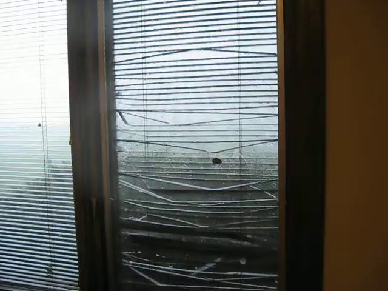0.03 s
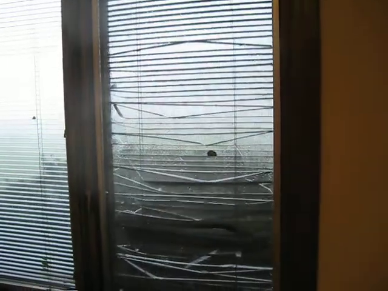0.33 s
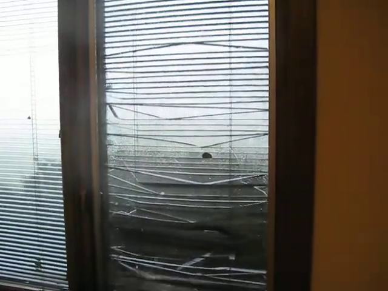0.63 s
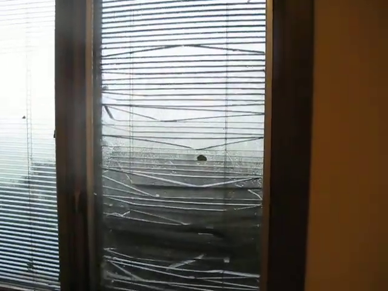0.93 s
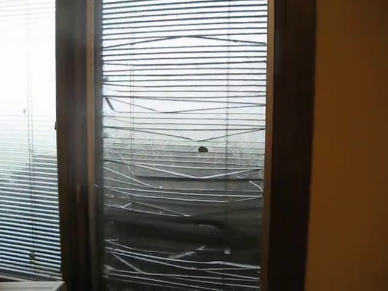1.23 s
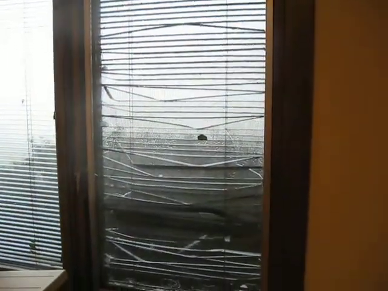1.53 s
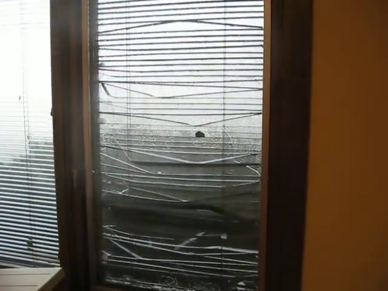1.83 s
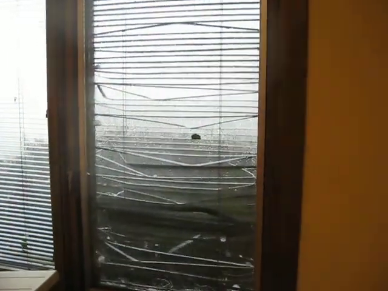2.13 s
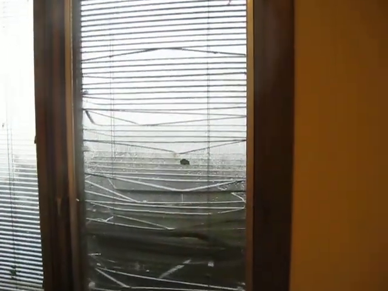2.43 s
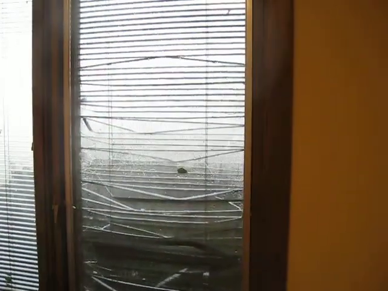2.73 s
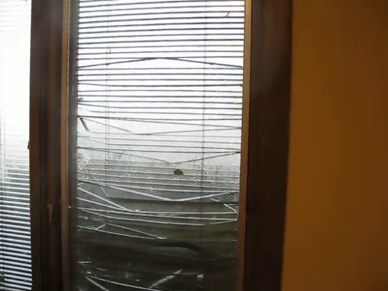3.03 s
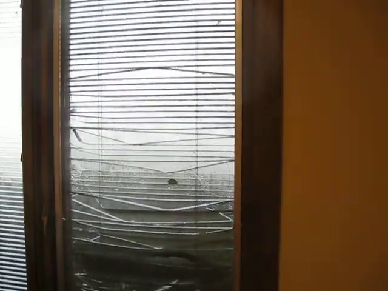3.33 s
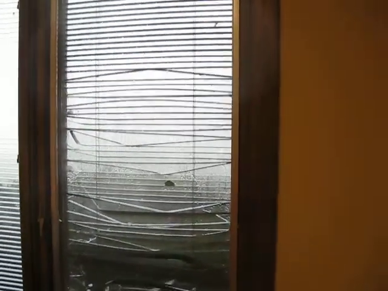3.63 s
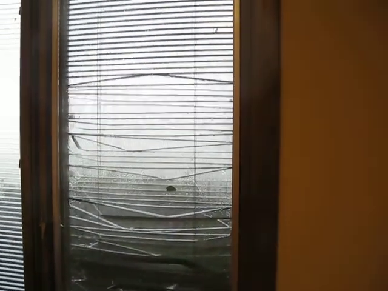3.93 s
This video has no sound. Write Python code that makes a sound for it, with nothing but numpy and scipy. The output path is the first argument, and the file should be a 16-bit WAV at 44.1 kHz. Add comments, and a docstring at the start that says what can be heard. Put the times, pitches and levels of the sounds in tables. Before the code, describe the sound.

Hailstones crack against windows over a roar of wind-driven rain, heard from indoors.

```python
"""A hailstorm beats on office windows, heard from inside the room.
After an instant of silence, wind-driven rain roars and drums on the panes, small ice patters and big
stones crack against the glass. Hard blows overload the recorder, whose gain control ducks the storm
and lets it swell back. From about 1.1 s, stones also hit farther windows and spray hisses on the glass.
From about 2.8 s to the end, the big stones fall thicker and the pane booms more strongly."""
import sys
import numpy as np
from scipy import signal
from scipy.io import wavfile
from scipy.ndimage import minimum_filter1d

SR = 44100
rng = np.random.default_rng(int(sys.argv[2]) if len(sys.argv) > 2 else 0)


def master_out(mix):
    """Clip the mix to full scale and print it as 16-bit PCM to the path in sys.argv[1]."""
    frames = np.transpose(np.atleast_2d(mix))
    ceiling = np.clip(frames, -1, 1)
    pcm = np.round(ceiling * 32767).astype(np.int16)
    wavfile.write(sys.argv[1], SR, pcm)


N = 176400

# force of the storm, as the level of its roar: t/s, level/dB
GUSTS = [(0, -27), (.3, -21), (.42, -19.5), (.6, -22), (.85, -20), (1.0, -24.5), (1.15, -21.5),
         (1.4, -22.5), (1.5, -24), (1.7, -19.5), (1.85, -20.5), (2.1, -23.5), (2.33, -21), (2.5, -21.5),
         (2.95, -24.5), (3.1, -21), (3.5, -24), (3.8, -21.5)]
# relative spectral densities of rain, spray, small ice, a stone's crack and its room tail: f/Hz, level/dB
ROAR_SPECTRUM = [(25, -28), (55, -56), (90, -4.5), (150, 1.5), (230, 5), (330, -1), (520, 3.5), (800, -1.5),
                 (1400, -6), (3000, -12.5), (6000, -18.5), (10000, -25.5), (16000, -32)]
SPRAY_SPECTRUM = [(2000, -9), (6000, 7), (9500, -0.5), (12000, 2), (16000, 10)]
PATTER_SPECTRUM = [(200, -16), (800, -1.5), (1500, -4.5), (2900, 0.5), (4300, -4.5), (6300, -11),
                   (10000, -19), (16000, -35)]
CRACK_SPECTRUM = [(100, -20), (450, -15.5), (1000, -8), (1600, -3.5), (2700, 0), (4500, -0.5), (6500, -1.5),
                  (10500, -4), (16000, -10)]
ROOM_SPECTRUM = [(100, -42), (450, -13), (900, -4.5), (1600, -2), (2900, -0.5), (4500, -2), (6300, -1.5),
                 (10500, -6.5), (16000, -16)]
# pane modes driven by the rain: f/Hz, relative level/dB, T60/s
DRUM_MODES = [(119.6, -2, 0.23), (168, -16, 0.13), (228.6, -1, 0.39), (258.7, 1.5, 0.33), (484, 4, 0.21),
              (580, 5.5, 0.071), (742, 5.5, 0.089)]
# sheets of spray on the glass: t/s, duration/s, level/dB
SPRAYS = [(1.163, .045, -26), (1.696, 0.064, -41), (1.836, 0.084, -31), (2.38, 0.015, -26),
          (2.61, 0.16, -39), (3.09, 0.022, -30), (3.34, .055, -30), (3.742, .012, -41), (3.78, 0.032, -33)]
# stones on farther windows, heard only through the room: t/s, level/dB
FAR_STONES = [(1.1254, -18.5), (1.335, -17.5), (1.6125, -20.5), (2.1481, -23), (2.2634, -25.5),
              (2.372, -18.5), (2.4575, -20), (2.669, -19.5), (3.0935, -25), (3.244, -20.5), (3.6637, -25),
              (3.709, -18.5)]
# modes of the whole pane under a stone: f/Hz, relative level/dB, T60/s
BOOM_MODES = [(276, -14.5, 0.72), (459.5, -14.5, 0.073), (766, -4.5, 0.22), (856, -8, 0.14),
              (940, -8.5, 0.17)]
# clusters of close high modes: f/Hz, bandwidth/Hz, relative level/dB, T60/s
RATTLE_CLUSTERS = [(5620, 390, -19, .27), (6320, 520, -12.5, 0.096)]
# damped modes of a knock: ratio to the knock's f, relative level/dB, T60/s
KNOCK_MODES = [(.36, -20.5, 0.059), (0.682, -15.5, 0.075), (.9, -18, 0.049), (1, -2, 0.03),
               (1.129, -7, 0.018), (1.55, -18, 0.036)]
# big stones on the near pane: t/s, level/dB, treble/dB, knock/dB, knock f/Hz, boom/dB
# (treble, knock and boom are relative to the stone's level)
NEAR_STONES = [(.04, 0.5, -4.5, -26, 2820, -22), (.083, 0.5, -11.5, -2, 1910, -19),
               (0.1675, 2, -2.5, -7, 3290, -33), (.4465, -28.5, 9, -10, 2800, -23),
               (0.4948, -8, -2.5, 7, 2730, -32), (0.5336, -11, -6, -6, 2900, -18),
               (0.6599, 6, 3.5, -9.5, 2800, -32), (0.8407, -1, -4.5, 1, 2790, -30),
               (0.8604, 3, 6, 1, 2500, -35), (1.0279, -17, 3, 12.5, 2710, -20),
               (1.2088, -1.5, -9.5, -1, 2560, -27), (1.4288, -5, -10, -14, 2600, -25),
               (1.4698, -9, -6, -2, 2650, -9), (1.964, 1.5, -15, -0.5, 2750, -16),
               (1.9749, 2.5, 0, -19, 3050, -28), (2.0188, -1, -5, 3.5, 2570, -5),
               (2.2039, -9.5, -10, 0.5, 2590, -14), (2.5128, 5, 2, -1.5, 2274, -36),
               (2.7606, -12, 1.5, -1, 2770, 0), (2.8285, -29, 9, -9, 2300, -10),
               (2.848, -8, -8, 0, 2150, -13), (2.869, -7, -5.5, -5, 2950, -11),
               (2.9472, -6, -6, 1, 2740, -8), (3.1446, -6, -6.5, 0, 2370, -20),
               (3.2954, -7, -12.5, -16, 2700, -14), (3.383, -4.5, 5, -4, 2740, -10),
               (3.4408, -4.5, -17, -4, 2780, -7), (3.4795, -7.5, -7, -7, 2520, -23),
               (3.5688, -22, 0, -9, 2700, -10), (3.578, -8.5, -2, 3.5, 2940, -9),
               (3.8278, -6.5, -16.5, -4.5, 2520, -9.5), (3.8845, -4.5, -4, 8, 2740, -5),
               (3.909, -7, -7, -4, 2800, -15), (3.923, -7, -5, 2, 2680, -12),
               (3.9635, -5, -11, 4.5, 2000, -18)]

BAND_EDGES_HZ = 22 * 2 ** np.arange(0, 9.9, 1 / 3)
BAND_CENTRES_HZ = np.sqrt(BAND_EDGES_HZ[1:] * BAND_EDGES_HZ[:-1])
ROOM_T60_S = 0.31
COLOUR_DB = 2.07   # spread of an impact's level from band to band
TIME = np.arange(N) / SR


def from_db(db):
    """Amplitude grows tenfold for every 20 dB."""
    return 10 ** (np.asarray(db) / 20)


def unit_rms(x):
    """Division by the rms gives a signal of unit power."""
    return x / np.sqrt(np.mean(x ** 2) + 1e-20)


def band_gains(spectrum):
    """Band power is spectral density times bandwidth; the powers are scaled to sum to 1."""
    hz, db = np.transpose(spectrum)
    gain = from_db(np.interp(np.log(BAND_CENTRES_HZ), np.log(hz), db)) * np.sqrt(BAND_CENTRES_HZ)
    return gain / np.linalg.norm(gain)


def bandpass(x, edges_hz):
    """A band-pass filter attenuates frequencies outside its edges."""
    return signal.sosfilt(signal.butter(2, edges_hz, "band", fs=SR, output="sos"), x)


def noise_bands():
    """Filtering white noise gives third-octave bands of unit rms, incoherent with their neighbours."""
    white = rng.standard_normal((3, N + SR // 4))
    return np.array([unit_rms(bandpass(white[k % 3], BAND_EDGES_HZ[k:k + 2])[-N:])
                     for k in range(len(BAND_CENTRES_HZ))])


def drift(corner_hz, step=40, settle=2000):
    """Low-passed noise fluctuates slowly, with unit rms."""
    pole = np.exp(-2 * np.pi * corner_hz * step / SR)
    white = rng.standard_normal(N // step + settle + 2)
    slow = signal.lfilter([1], [1, -2 * pole, pole ** 2], white)[settle:]
    return np.interp(np.arange(N) / step, np.arange(len(slow)), unit_rms(slow))


def arrivals(per_s):
    """Poisson process: every sample has the same small chance of an impact."""
    return rng.random(N) < per_s / SR


def impulses(times, sizes):
    """Brief impacts are idealised as single-sample impulses."""
    return np.bincount(np.clip(times * SR, 0, N - 1).astype(int), sizes, N) + 1e-18


def decay(power, t60):
    """Exponential decay: each input of power falls by 60 dB in t60 seconds."""
    return signal.lfilter([1], [1, -10 ** (-6 / (t60 * SR))], power)


def resonator(force, hz, t60):
    """A damped oscillator answers a unit impulse with a decaying sine of height about 1."""
    pole, angle = from_db(-60 / (t60 * SR)), 2 * np.pi * hz / SR
    return signal.lfilter([0, np.sin(angle)], [1, -2 * pole * np.cos(angle), pole ** 2], force)


def rain(bands, storm_db, flicker_db=1.77, flicker_hz=11.8, drum_db=-10):
    """Incoherent addition merges drops and wind into a flickering roar; drops excite the panes' modes."""
    roar = sum(gain * band * from_db(flicker_db * drift(flicker_hz))
               for gain, band in zip(band_gains(ROAR_SPECTRUM), bands))
    drops = arrivals(per_s=900) * rng.standard_normal(N) + 1e-18
    drum = sum(from_db(db) * unit_rms(resonator(drops, hz, t60)) for hz, db, t60 in DRUM_MODES)
    return from_db(storm_db) * (unit_rms(roar) + from_db(drum_db) * unit_rms(drum))


def spray(bands):
    """Shot noise: fine droplets thrown against the glass overlap in bright hisses that swell and fade."""
    swells = sum(from_db(db) / (1 + ((TIME - start - length / 2) / (0.42 * length)) ** 6)
                 for start, length, db in SPRAYS)
    droplet_power = decay(arrivals(per_s=700) * rng.exponential(1, N) + 1e-18, t60=0.011)
    return swells * unit_rms(np.sqrt(droplet_power)) * (band_gains(SPRAY_SPECTRUM) @ bands)


def patter(bands, storm_db, mean_db=-27, gust_share=0.15, room_db=-6.5):
    """Incoherent powers add: random ticks of small ice, their reverberation and that of far stones."""
    times = np.flatnonzero(arrivals(per_s=220)) / SR
    far_times, far_db = np.transpose(FAR_STONES)
    far_power = decay(impulses(far_times, from_db(far_db) ** 2), t60=0.3)
    level = from_db(mean_db + gust_share * (storm_db - storm_db.mean()))
    out = 0
    for gain, band in zip(band_gains(PATTER_SPECTRUM), bands):
        ticks = impulses(times, from_db(COLOUR_DB * rng.standard_normal(len(times))) ** 2)
        power = decay(ticks, t60=0.023) + from_db(room_db) ** 2 * decay(ticks, ROOM_T60_S)
        out += gain * band * np.sqrt(power / power.mean() * level ** 2 + far_power)
    return out


def boom(times, levels_db, spread_db=2):
    """Impulse response of the whole pane: each blow excites each low mode with its own strength."""
    out = 0
    for hz, mode_db, t60 in BOOM_MODES:
        strengths = from_db(levels_db + mode_db + spread_db * rng.standard_normal(len(times)))
        out += resonator(impulses(times, strengths), hz, t60)
    return out


def rattle(times, levels_db, growth=1.1):
    """Modal overlap: close high modes blur into narrow-band noise, growing faster than the blow."""
    blows = impulses(times, from_db(growth * levels_db) ** 2)
    out = 0
    for hz, width_hz, db, t60 in RATTLE_CLUSTERS:
        cluster = bandpass(rng.standard_normal(N), [hz - width_hz / 2, hz + width_hz / 2])
        out += from_db(db) * unit_rms(cluster) * np.sqrt(decay(blows, t60))
    return out


def knocks(times, levels_db, pitches_hz, scatter=0.044):
    """Superposed damped modes ring briefly; where a stone lands sets the pitch and shifts the modes."""
    out, t = np.zeros(N + SR), np.arange(SR // 10) / SR
    ratio, mode_db, t60 = np.transpose(KNOCK_MODES)[:, :, None]
    for start, db, hz in zip(times, levels_db, pitches_hz):
        shift, phase = rng.standard_normal((2, len(ratio), 1))
        mode_hz = hz * ratio * (1 + scatter * shift * (ratio != 1))
        modes = np.sin(2 * np.pi * (mode_hz * t + phase))
        envelopes = from_db(db + mode_db - 60 * t / t60)
        out[int(start * SR):][:len(t)] += np.sum(envelopes * modes, axis=0)
    return out[:N]


def cracks(times, levels_db, treble_db, crush_s=0.0017, t60=0.046, shelf_hz=5300, room_db=-11.5):
    """Crushing ice radiates a broadband burst; its direct and reverberant sound add in power."""
    since_crush = np.maximum(np.arange(SR // 16) / SR - crush_s, 0)
    burst_power = 10 ** (-6 * since_crush / t60)
    crack_gains, room_gains = band_gains(CRACK_SPECTRUM), from_db(room_db) * band_gains(ROOM_SPECTRUM)
    out = 0
    for hz, crack_gain, room_gain, band in zip(BAND_CENTRES_HZ, crack_gains, room_gains, noise_bands()):
        colour_db = COLOUR_DB * rng.standard_normal(len(times))
        shelf_db = treble_db / (1 + (shelf_hz / hz) ** 4)
        blows = impulses(times, from_db(levels_db + colour_db + shelf_db) ** 2)
        direct = crack_gain ** 2 * np.abs(signal.oaconvolve(blows, burst_power)[:N])
        reverberant = room_gain ** 2 * decay(blows, ROOM_T60_S)
        out += band * np.sqrt(direct + reverberant)
    return out


def hailstones():
    """Impact excitation: each big stone cracks and sets the near pane knocking, rattling and booming."""
    times, db, treble_db, knock_db, knock_hz, boom_db = np.transpose(NEAR_STONES)
    return (cracks(times, db, treble_db) + knocks(times, db + knock_db, knock_hz)
            + rattle(times, db + treble_db) + boom(times, db + boom_db))


def scene():
    """Superposition: the sound pressures of water and ice add in one channel."""
    storm_db = np.interp(TIME, *np.transpose(GUSTS))
    water, ice = noise_bands(), noise_bands()
    return (rain(water, storm_db) + spray(water) + patter(ice, storm_db) + hailstones())[None]


def smooth(x, tau_s):
    """A first-order lag averages its input over the time constant tau_s."""
    pole = np.exp(-1 / (tau_s * SR))
    return signal.lfilter([1 - pole], [1, -pole], x)


def gain_control(x, threshold_db=-12, lag_s=0.001, attack_s=0.0031, hold_s=0.039, release_db_per_s=174):
    """Compression: gain drops just after the level passes a threshold, holds, then climbs steadily."""
    level_db = 10 * np.log10(smooth(x ** 2, tau_s=0.00057) + 1e-12)
    excess_db = np.maximum(level_db - threshold_db, 0)
    half_hold = int(hold_s * SR / 2)
    held_db = -minimum_filter1d(-excess_db, 2 * half_hold + 1, origin=half_hold)   # trailing maximum
    climb_db = release_db_per_s * TIME
    cut_db = smooth(np.maximum.accumulate(held_db + climb_db) - climb_db, attack_s)
    return x * from_db(-np.interp(TIME - lag_s, TIME, cut_db))


def record(dry, ceiling=0.56, notch_hz=7910, notch_db=-19, switch_on_s=0.072, cutoff_hz=15900):
    """Saturation rounds the peaks left by gain control; a treble notch, switch-on and low-pass follow."""
    drive = gain_control(dry[0]) / ceiling
    clipped = ceiling * drive / (1 + drive ** 6) ** (1 / 6)
    notched = signal.filtfilt(*signal.iirnotch(notch_hz, Q=5.1, fs=SR), clipped)
    leak = from_db(notch_db) * (clipped - notched)
    gated = (notched + leak) * (TIME >= switch_on_s)
    return signal.oaconvolve(gated, signal.firwin(201, cutoff_hz, fs=SR), "same")[None]


dry = scene()
out = record(dry)
master_out(out)
```